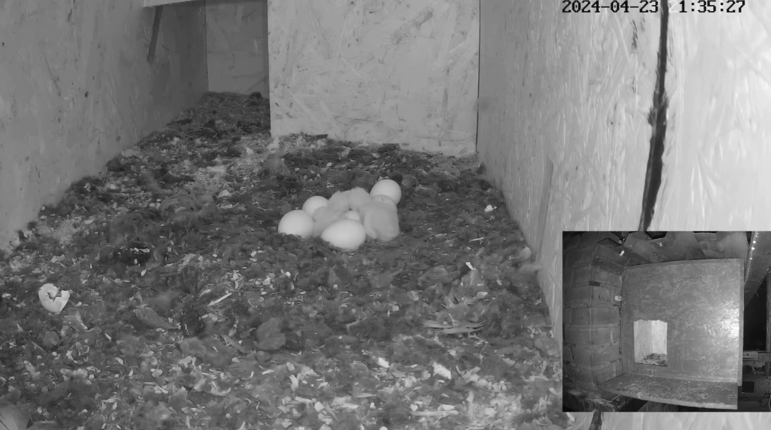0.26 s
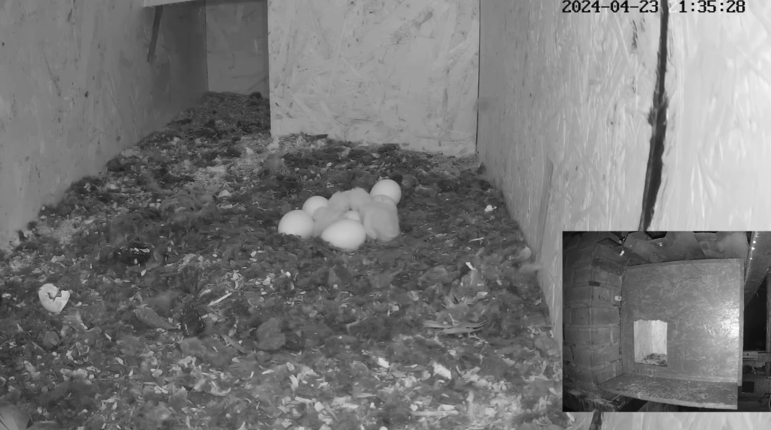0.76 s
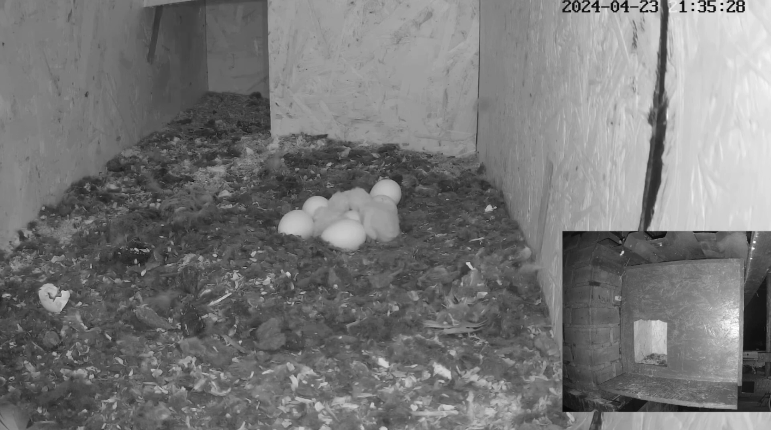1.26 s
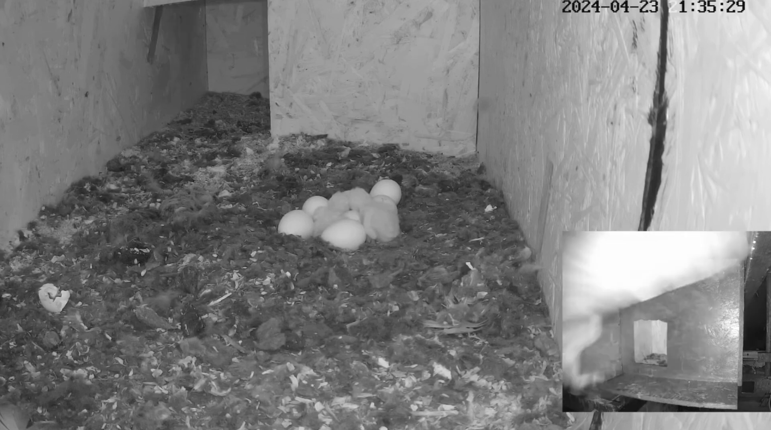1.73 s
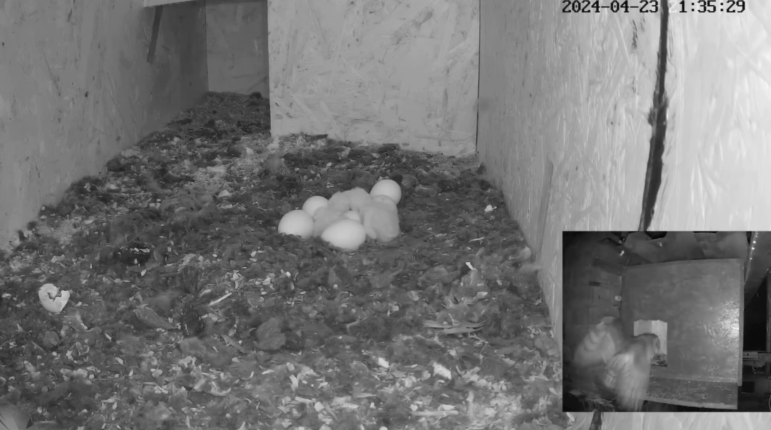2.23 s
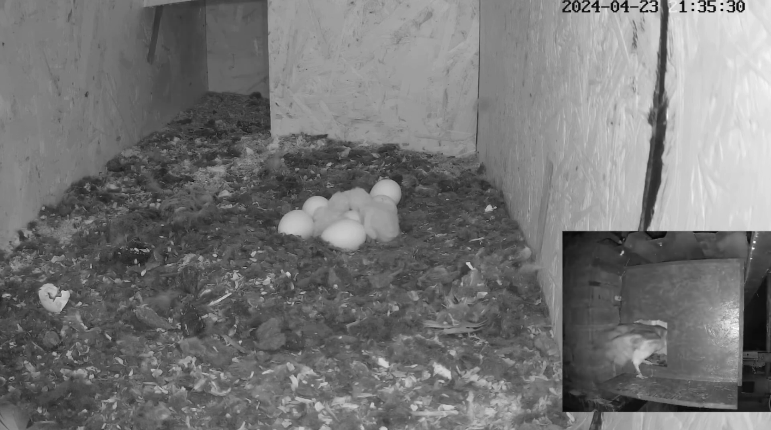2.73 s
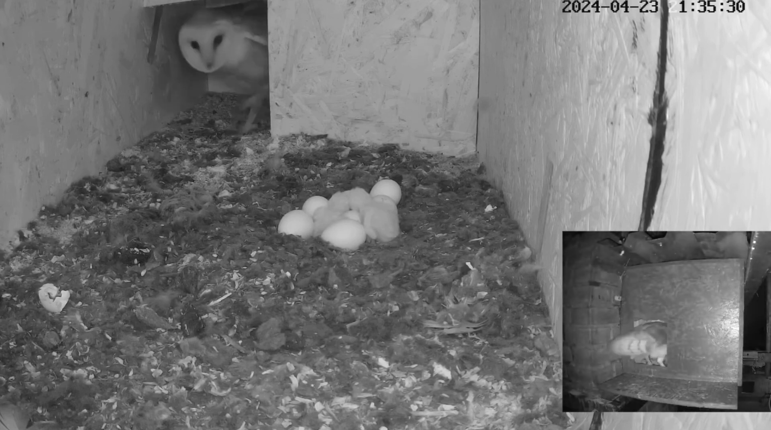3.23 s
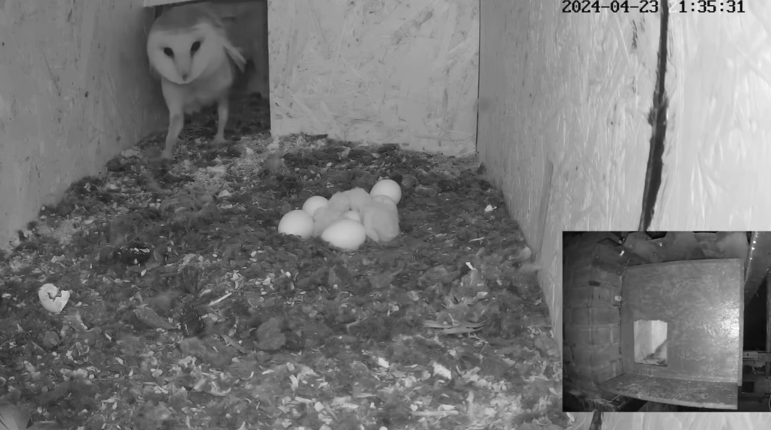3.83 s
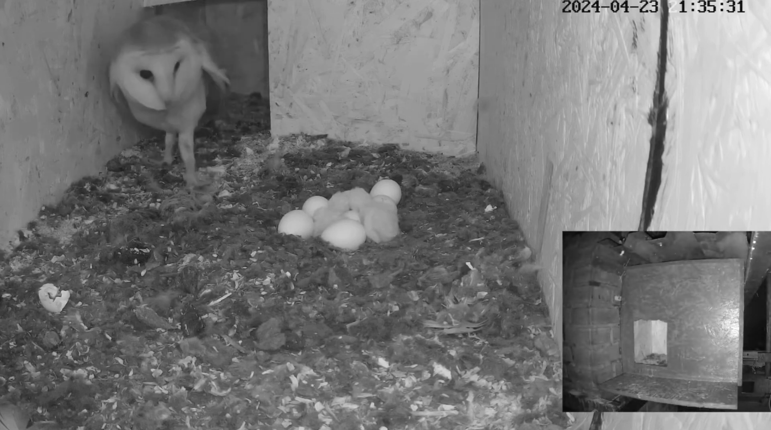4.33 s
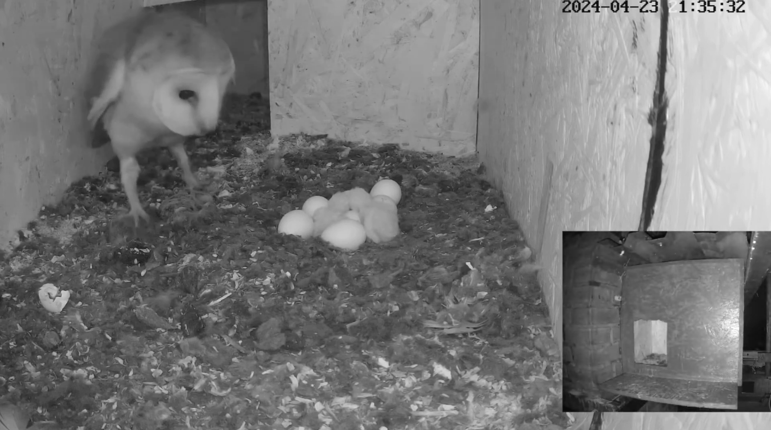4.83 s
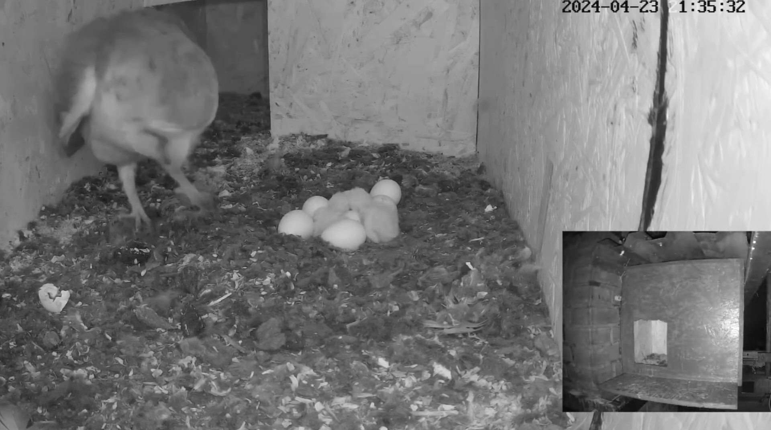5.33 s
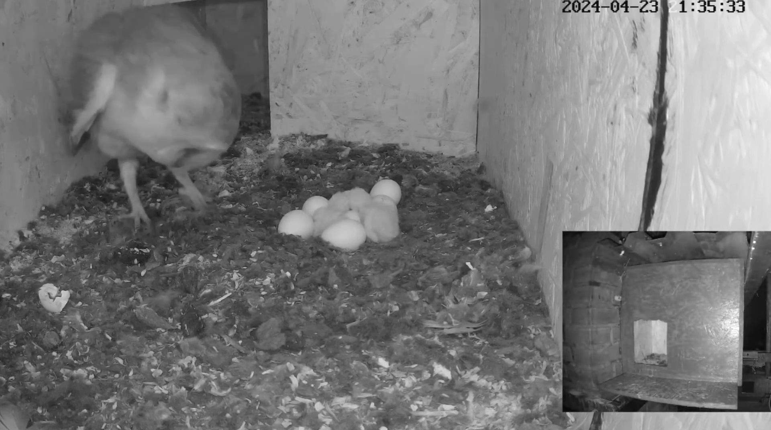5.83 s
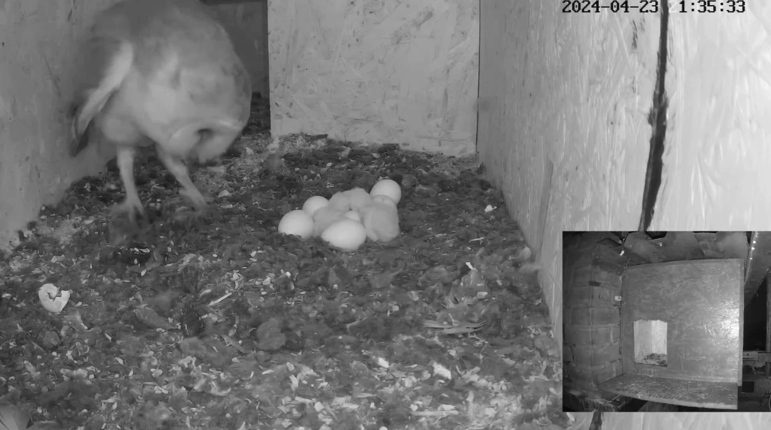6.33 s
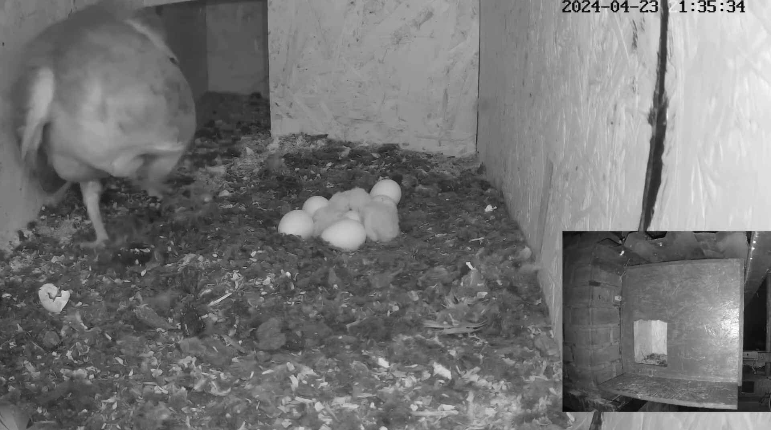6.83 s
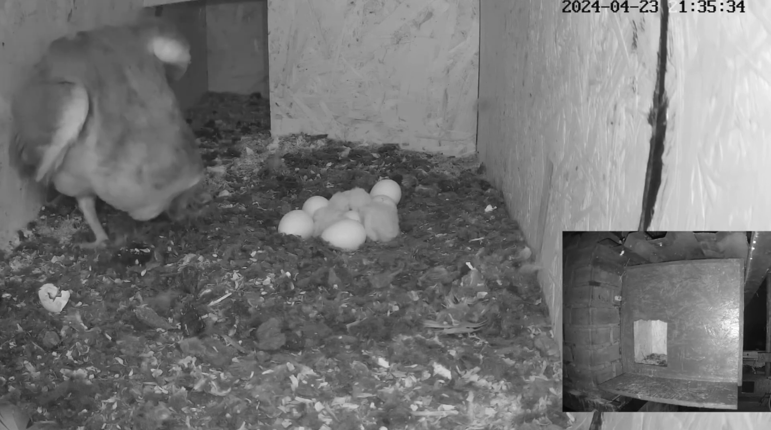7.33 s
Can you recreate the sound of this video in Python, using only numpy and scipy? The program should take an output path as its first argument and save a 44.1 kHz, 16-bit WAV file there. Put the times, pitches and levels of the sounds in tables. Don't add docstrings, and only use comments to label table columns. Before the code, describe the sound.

In a small wooden nest box at night, owl chicks give rapid bursts of high, upward-sliding chirps mixed with raspy breath. After the first burst an adult lands with a sharp, hollow wooden knock, its claws scrape at the entrance, and several footfalls clatter and boom softly. Chittering resumes three more times between quiet gaps. A close, hissy small camera microphone rumbles on its mount.

```python
import sys
import numpy as np
from scipy import signal
from scipy.fft import rfft, irfft
from scipy.io import wavfile
from scipy.ndimage import uniform_filter1d

SR = 44100
rng = np.random.default_rng(int(sys.argv[2]) if len(sys.argv) > 2 else 0)


def wrap_up_sound(samples):
    columns = np.atleast_2d(samples).T
    tamed = np.clip(columns, -1, 1)
    steps = np.round(tamed * 32767).astype(np.int16)
    wavfile.write(sys.argv[1], SR, steps)


def linear_from_db(decibels):
    return 10 ** (np.asarray(decibels, float) / 20)


N = 334278

# pitch_hz, level_db
CHICK_THROAT = [(1500, -15.5), (2300, -11.5), (2750, -15.5), (3450, -2), (3900, -1.5), (4400, 1), (4800, 6),
                (5200, -1.5), (5850, -7.5), (6400, -1.5), (7400, -15), (8500, -13), (9200, -21),
                (12000, -29)]
# start_s, peak_db, pitch_hz, t60_s
FLOOR_BOOMS = [(1.14, -27, 346, 0.079), (1.157, -35, 302, 0.15), (1.425, -36.5, 381, 0.23),
               (1.496, -35, 385, 0.054), (1.979, -48.5, 347, 0.17), (2.034, -42, 349, 0.15),
               (2.153, -37, 348.4, 0.22), (2.199, -40.5, 351, 0.12), (2.514, -40.5, 357.4, 0.25),
               (2.629, -49.5, 361, 0.13), (2.76, -54, 349, 0.16), (2.914, -53, 427, 0.079),
               (3.319, -49, 364, 0.2), (3.367, -51.5, 374, 0.48), (3.413, -40.5, 360, 0.19),
               (3.797, -46.5, 357, 0.068), (4.185, -61, 438, 0.16), (4.615, -50, 408, 0.095),
               (4.65, -52.5, 421, 0.14), (7.215, -56, 286, .15), (4.692, -48.5, 353.5, 0.13),
               (4.93, -62, 380, 0.33), (5.032, -51, 260, 0.047), (5.19, -59, 323, 0.14),
               (6.701, -45.5, 331, 0.19), (6.755, -47, 343, 0.093)]


def evened(x):
    return x / np.sqrt(np.mean(x ** 2) + 1e-20)


def drifting(noise, size):
    return evened(uniform_filter1d(uniform_filter1d(noise, size=size), size=size))


def read(points, hz):
    f, value = np.transpose(points)
    return np.interp(np.log(hz + 1), np.log(f + 1), value)


def add(mix, s, sound):
    part = mix[round(s * SR):][:len(sound)]
    part += sound[:len(part)]


def coloured(x, gain_db):
    return irfft(rfft(x) * linear_from_db(gain_db(np.fft.rfftfreq(len(x), 1 / SR))), len(x))


def hump(hz, centre_hz, octaves):
    return np.maximum(-6 * (np.log2((hz + 1) / centre_hz) / octaves) ** 2, -80)


def stroke(t, length, rise, fall):
    return np.clip(t / rise, 0, 1) * np.exp(-np.maximum(t - length, 0) / fall)


def hiss():
    # pitch_hz, density_db (per Hz)
    hiss_spectrum = [(35, -25), (60, -14), (248, -7), (350, -14), (440, -10), (1070, -13.5), (1180, -15),
                     (1780, -16.5), (2340, -18), (13000, -24.5), (14300, -21)]
    noise = coloured(rng.standard_normal(N), lambda f: read(hiss_spectrum, f))
    return linear_from_db(-57) * evened(noise)


def stirred(t, rest_db, step_db, share, rise, t60):
    firm_step_db = -40
    power = linear_from_db(2 * rest_db) + 0 * t
    for s, db, *_ in FLOOR_BOOMS:
        peak_db = step_db + share * (db - firm_step_db)
        below_db = np.where(t < s, 20 * (s - t) / rise, 60 * (t - s) / t60)
        power = power + linear_from_db(2 * (peak_db - below_db))
    return np.sqrt(power)


def shaking():
    # time_s, level_db
    shake_levels = [(0.0, -52), (0.78, -54), (1.1, -42), (1.14, -43), (1.26, -39), (1.33, -47),
                    (1.5, -38.5), (1.75, -53), (2.53, -55.5), (2.74, -48), (3.25, -57), (3.4, -47.5),
                    (4.03, -58), (4.35, -49.5), (4.96, -55), (5.47, -57.5), (7.28, -50.5), (7.58, -50)]
    # pitch_hz, density_db (per Hz)
    sway_spectrum = [(7.1, -47), (12, -11), (27, 7.5), (43, 5.5), (100, -20.5), (130, -47), (220, -120)]
    t, (a, b, c) = np.arange(N) / SR, rng.standard_normal((3, N))
    coarse = t[::100]
    sway = coloured(a, lambda f: np.where(f < 110, read(sway_spectrum, f), -90))
    shuffle = coloured(b, lambda f: hump(f, 118.0, 0.76))
    rustle = coloured(c, lambda f: hump(f, 354, 0.24))
    shuffle_level = stirred(coarse, rest_db=-67, step_db=-56.5, share=0.34, rise=0.14, t60=0.86)
    rustle_level = stirred(coarse, rest_db=-73.5, step_db=-66.5, share=0.17, rise=0.52, t60=2.5)
    return (linear_from_db(np.interp(t, *np.transpose(shake_levels))) * evened(sway)
            + np.interp(t, coarse, shuffle_level) * evened(shuffle)
            + np.interp(t, coarse, rustle_level) * evened(rustle))


def jolts():
    # start_s, peak_db, pitch_hz, t60_s
    jolt_table = [
        (1.02, -36, 37.5, 0.65),
        (1.374, -15, 15.6, 0.12),
        (1.4939, -32.5, 156, 0.11),
        (2.535, -42, 150, 0.11),
        (3.68, -45.5, 130, 0.1),
        (5.009, -37, 46, 0.36),
        (6.674, -40, 43.5, 0.18),
        (6.72, -48.5, 170, 0.14),
        (7.196, -38, 53, 0.16),
    ]
    mix, t = np.zeros(N), np.arange(20000) / SR
    for s, db, hz, t60 in jolt_table:
        rise = np.clip(t * hz / 0.44, 0, 1)
        add(mix, s, linear_from_db(db + 1.5 - 60 * t / t60) * rise * np.sin(2 * np.pi * hz * t))
    return mix


def boom(db, hz, t60, phases):
    t = np.arange(14000) / SR
    modes = [(1, 0.96), (1.17, 0.26), (0.4, 0.22), (1.55, 0.12), (.74, 0.16)]
    cluster = sum(g * np.sin(2 * np.pi * (hz * ratio * t + p)) for (ratio, g), p in zip(modes, phases))
    swell = 1 - np.exp(-(t / 0.0048) ** 2)
    sound = linear_from_db(-60 * t / np.clip(t60, .05, .4)) * swell * cluster
    return linear_from_db(db + 4.0) * sound / abs(sound).max()


def booms():
    floor_hz = 345
    mix = np.zeros(N)
    for (s, *row), phases in zip(FLOOR_BOOMS, rng.random((len(FLOOR_BOOMS), 4))):
        add(mix, s - .006, boom(*row, [floor_hz * s, *phases]))
    return mix


def panel(drive, centre_hz, octaves):
    # pitch_hz, level_db, t60_s
    panel_modes = [(496, 16, 0.046), (542, 5, 0.11), (688, -8, 0.029), (957, 1, 0.027), (1053, 9.5, 0.028),
                   (1380, 10, 0.048), (1700, 14, 0.023), (1840, 8, 0.051), (2120, 5, 0.011),
                   (2550, 2, 0.088), (2620, -1, 0.031), (2960, -3, 0.031), (3170, 7, 0.038),
                   (3720, -9, 0.042)]
    t, sound = np.arange(len(drive)) / SR, linear_from_db(-120) * drive
    for hz, db, t60 in panel_modes:
        near_db = hump(hz, centre_hz, octaves)
        if near_db < -38:
            continue
        mode = linear_from_db(-60 * t / min(t60, .08)) * np.sin(2 * np.pi * hz * t)
        ring = signal.fftconvolve(drive, mode)[:len(t)]
        sound = sound + linear_from_db(db + near_db) * evened(ring)
    return sound


def knock(length, wood_db, wood_hz, claw_db, claw_hz, noise, luck):
    t = np.arange(len(noise)) / SR
    slips = np.convolve(luck < .005, np.exp(-t[:400] / 0.00075))[:len(t)]
    touch = stroke(t, length, .25 * length, np.minimum(.6 * length, .005))
    impacts = noise * (.6 + slips) * touch
    wood = panel(noise * touch, wood_hz, .17)
    upper = panel(impacts, claw_hz, 0.35)
    padded = np.pad(impacts, 500)
    scratch = coloured(padded, lambda f: hump(f, claw_hz, claw_hz / 4200))[500:-500]
    held = int((length + .003) * SR)
    wood, upper, scratch = (v / np.sqrt(np.mean(v[:held] ** 2)) for v in (wood, upper, scratch))
    grip = np.clip((4200 - claw_hz) / 2500, 0, 1)
    return linear_from_db(wood_db) * wood + linear_from_db(claw_db) * (0.24 * grip * upper + 0.82 * scratch)


def contacts():
    # start_s, length_s, wood_db, wood_centre_hz, claw_db
    foot_knocks = [(1.121, 0.0077, -32, 895, -44.5), (1.126, 0.013, -40, 680, -45),
                   (1.121, 0.006, -39, 2530, -44), (1.124, 0.023, -44, 1840, -61),
                   (1.15, 0.0085, -43, 1140, -50), (1.358, 0.014, -56.5, 780, -66),
                   (1.415, 0.011, -40, 940, -45), (1.424, 0.03, -40, 730, -48.5),
                   (1.414, 0.021, -49, 1380, -54), (1.45, 0.031, -56, 1020, -46),
                   (1.488, 0.0078, -48.5, 1210, -49.5), (1.4942, 0.0037, -46.5, 516, -58),
                   (1.819, 0.0069, -47.5, 990, -48), (1.824, .014, -55, 690, -61),
                   (1.973, 0.024, -57, 1200, -71), (2.013, 0.035, -47, 840, -43),
                   (2.028, 0.02, -44.5, 540, -43), (2.024, .03, -57, 2120, -60),
                   (2.03, 0.026, -49, 1760, -45), (2.126, 0.0016, -35.5, 1750, -59),
                   (2.127, 0.026, -49, 1380, -52), (2.13, 0.013, -45, 2100, -61),
                   (2.503, 0.0073, -55.5, 763, -51.5), (2.507, 0.035, -60, 1520, -58.5),
                   (2.551, 0.029, -66, 1960, -66), (2.556, 0.089, -70, 885, -61),
                   (2.952, 0.0058, -52.5, 880, -55), (3.426, 0.017, -53.5, 950, -69),
                   (3.788, 0.0081, -58, 940, -65), (5.023, 0.0035, -64, 700, -68),
                   (6.654, 0.0047, -61, 850, -70)]
    # start_s, length_s, level_db, centre_hz
    claw_ticks = [(1.414, .06, -58, 3800), (1.548, 0.021, -60.5, 2370), (1.625, 0.0045, -55, 2550),
                  (1.656, .02, -60, 2340), (1.822, 0.0032, -45, 2540), (2.016, 0.025, -42.5, 3530),
                  (2.0334, 0.0022, -34, 2700), (2.037, 0.0019, -45, 2200), (2.039, 0.0017, -42.5, 3200),
                  (2.0449, 0.001, -38, 1910), (2.1295, 0.0025, -37.5, 2130), (2.1294, .003, -38.5, 2700),
                  (2.506, 0.0024, -55, 2180), (1.125, 0.0084, -58, 3700), (2.192, 0.0091, -55.5, 2030),
                  (2.325, 0.0086, -57, 2400), (6.653, 0.0031, -51, 5530), (6.654, 0.0032, -50, 2200),
                  (6.716, 0.0042, -56, 7000)]
    # start_s, level_db, centre_hz
    drag_slips = [(1.4185, -49, 3400), (1.4282, -45.5, 3550), (1.4315, -41, 2500), (1.4413, -41, 2920),
                  (1.4516, -46, 3300), (1.452, -42, 2900), (1.458, -50, 3200), (1.4625, -47, 2700),
                  (1.467, -45, 2400), (1.473, -44, 2500), (1.4895, -46, 3300)]
    slip_s, sill_db, sill_hz = 0.00077, -5, 850
    tick_wood_db, foot_claw_hz = -36, 2400
    touches = [(*row, foot_claw_hz) for row in foot_knocks]
    touches += [(s, d, db + tick_wood_db, 1400, db, hz) for s, d, db, hz in claw_ticks]
    touches += [(s, slip_s, db + sill_db, sill_hz, db, hz) for s, db, hz in drag_slips]
    mix = np.zeros(N)
    noise, luck = rng.standard_normal((len(touches), 8192)), rng.random((len(touches), 8192))
    for k, (s, *row) in enumerate(touches):
        size = int((row[0] + .09) * SR)
        add(mix, s, knock(*row, noise[k, :size], luck[k, :size]))
    return mix


def squeak():
    start_s, length_s, pitch_hz, level_db = 1.4705, .009, 2700, -52
    mix, t = np.zeros(N), np.arange(int(length_s * SR)) / SR
    tone = sum(np.sin(2 * np.pi * k * pitch_hz * t) for k in range(1, 4))
    add(mix, start_s, linear_from_db(level_db) * np.hanning(len(t)) * tone)
    return mix


def landing():
    # start_s, level_db
    toe_blows = [
        (1.1225, -10),
        (1.1258, 0),
        (1.134, -2),
    ]
    # pitch_hz, level_db, t60_s
    roof_modes = [(760, -26, .03), (920, -39, 0.023), (1004, -16, 0.052), (1040, -32, 0.042),
                  (1104, -20, 0.034), (1480, -38, 0.033), (1800, -39, 0.046), (2100, -43, .03),
                  (2450, -36, 0.05), (2330, -39, .022), (2870, -46, .03), (3300, -54, .04),
                  (4410, -51, .04)]
    rise_s, scatter_turns = 0.0013, .25
    mix, t = np.zeros(N), np.arange(6000) / SR
    for (s, blow_db), phases in zip(toe_blows, rng.random((len(toe_blows), len(roof_modes)))):
        ring = sum(linear_from_db(db - 60 * t / t60) * np.sin(2 * np.pi * (hz * t + scatter_turns * p))
                   for (hz, db, t60), p in zip(roof_modes, phases))
        add(mix, s, linear_from_db(blow_db) * ring * (1 - np.exp(-t / rise_s)))
    return mix


def adult():
    return landing() + booms() + contacts() + squeak() + jolts()


def box(mix):
    # pitch_hz, level_db, t60_s
    air_modes = [(2930, -26, 0.13), (3170, -34, 0.045), (3590, -5, 0.36), (3906, 2.5, 0.078),
                 (4610, -3.5, 0.12), (4785, -11, 0.049), (5460, -6, 0.031), (6090, -5, 0.023),
                 (6430, -2, 0.039), (6697, 2.5, 0.042), (6840, -0.5, 0.029), (7200, -15, 0.026),
                 (8800, 0, 0.022), (9110, 2.5, 0.027)]
    tail_db, tail_t60_s = -10, 0.058
    t = np.arange(4000) / SR
    echoes = rng.choice([-1., 1.], len(t)) * (rng.random(len(t)) < .05) * (t > .003)
    walls = echoes * linear_from_db(-60 * t / tail_t60_s)
    modes = np.zeros(len(t))
    for k, (hz, db, t60) in enumerate(air_modes):
        unit_gain = 2 * np.log(1000) / (t60 * SR)
        modes += (-1) ** k * linear_from_db(db - 60 * t / t60) * unit_gain * np.sin(2 * np.pi * hz * t)
    response = linear_from_db(1.5) * modes + linear_from_db(tail_db) * walls / np.linalg.norm(walls)
    return mix + signal.oaconvolve(mix, response)[:N]


def rasp(length, db, rise, breath):
    flap_hz, wander, voiced = 640, .09, .5
    t = np.arange(len(breath)) / SR
    puffs = linear_from_db(3.0 * drifting(breath[::-1], 100))
    drift = drifting(np.roll(breath, 3000), 260)
    turns = 2 * np.pi * np.cumsum(flap_hz * (1 + wander * drift)) / SR
    flaps = evened(sum(np.cos(k * turns + k * k) for k in range(3, 14)))
    source = (voiced * flaps + (1 - voiced) * breath) * puffs
    air = coloured(source, lambda f: 1.12 * read(CHICK_THROAT, f * 1.012) + hump(f, 2900, 7.0))
    return linear_from_db(db - 5.2 * t / length) * evened(air) * stroke(t, length - .004, rise, 0.0013)


def note(length, start_hz, mid_hz, end_hz, db, chance, climb=1, bend=1, held=False):
    flutter_db, ragged_db = 2.6, 1.6
    held_dull_db, held_fade_db = -1, 1.5
    root_db, release_s = -3, .006
    u = np.linspace(0, 1, int(length * SR))
    hz = np.polyval(np.polyfit([0, .5, 1], [start_hz, mid_hz, end_hz], 2), u)
    if held:
        hz = start_hz + (end_hz - start_hz) * np.sin(np.pi / 2 * np.minimum(u / climb, 1)) ** bend
    wobble, flutter = (drifting(c, 40)[:len(u)] for c in chance)
    turns = 2 * np.pi * np.cumsum(hz * (1 + .008 * wobble)) / SR
    glide = np.clip(end_hz / start_hz - 1, 0, .45)
    swell_db = 10.0 * glide * (np.exp(-((u - .4) / 0.61) ** 2) - 1)
    bright_db = -2.5 + 1.04 * (db + 42.0 + swell_db)
    gains = np.array([linear_from_db(read(CHICK_THROAT, k * hz) + 0.14 * swell_db + bright_db * min(k - 1, 1) - 0.51 * k)
                      for k in range(1, 6)])
    gains[1:] *= np.clip(u * length / (0.0021 + held * 0.03 * glide), 0, 1)
    gains[2:] *= linear_from_db(held * held_dull_db * np.arange(1, 4)[:, None] * np.clip(u / climb, 0, 1.3) ** 3)
    gains[0] *= linear_from_db(held * root_db * (2 - 3.2 * u ** 3))
    gains *= linear_from_db([ragged_db * k * np.roll(flutter, 97 * k) for k in range(5)])
    voice = (gains * np.sin(np.arange(1, 6)[:, None] * turns)).sum(0)
    strong = np.percentile(np.sqrt((gains ** 2).sum(0) / 2), 80)
    level = linear_from_db(db + flutter_db * flutter + held * held_fade_db * u ** 3)
    release = np.clip((1 - u) * length / release_s, 0, 1) ** .5
    return level * voice / strong * release * signal.windows.tukey(len(u), 0.004 / length)


def chicks():
    # start_s, length_s, start_hz, top_hz, level_db
    main_sweeps = [(0.178, 0.039, 2060, 2800, -39.5), (0.554, 0.046, 1990, 2735, -44),
                   (1.775, 0.036, 1770, 2620, -38.5), (1.864, 0.031, 1930, 2760, -41),
                   (3.095, 0.035, 1740, 2580, -38.5), (3.176, 0.034, 1700, 2700, -38),
                   (3.271, 0.041, 1800, 2840, -42.5), (3.374, 0.035, 1803, 2770, -39),
                   (4.21, 0.031, 1743, 2810, -37.5), (4.294, 0.044, 1800, 2920, -40.5),
                   (4.6, 0.014, 1800, 2490, -44.5), (6.273, 0.028, 1810, 2625, -39.5),
                   (6.36, 0.041, 1730, 2690, -44), (7.459, 0.028, 1744, 2660, -37),
                   (7.551, 0.032, 2330, 2704, -40.5)]
    # start_s, length_s, start_hz, top_hz, level_db
    ramp_sweeps = [
        (0.266, 0.04, 2190, 2930, -39.5),
        (0.361, 0.042, 2224, 2900, -40),
        (0.461, 0.038, 2240, 2900, -40.5),
        (1.954, 0.034, 2040, 2930, -44.5),
        (2.051, 0.036, 2190, 2980, -44),
        (4.394, 0.036, 1944, 2990, -39),
        (6.184, 0.03, 1746, 2594, -37),
    ]
    # start_s, length_s, middle_hz, level_db
    return_strokes = [(0.21, 0.05, 2330, -48), (0.303, 0.04, 2294, -50.5), (0.404, 0.03, 2300, -49),
                      (0.5, 0.028, 2290, -51), (2.1, 0.024, 2200, -53), (3.134, 0.018, 2110, -53),
                      (3.322, 0.024, 2120, -55), (3.413, 0.026, 2180, -54), (4.238, 0.04, 2360, -47.5),
                      (4.337, 0.036, 2350, -50), (4.44, 0.032, 2270, -51)]
    # start_s, length_s, middle_hz, level_db
    upward_pips = [(0.111, 0.039, 2524, -43.5), (4.142, 0.016, 2237, -44), (4.153, .014, 2900, -56),
                   (4.166, 0.019, 3360, -50), (0.213, 0.014, 3110, -51), (0.33, 0.017, 3250, -48),
                   (0.428, 0.023, 2390, -47), (0.528, 0.025, 2390, -53), (0.531, 0.028, 3450, -55),
                   (1.717, 0.018, 2410, -38), (1.93, .022, 3070, -47.5), (2.119, 0.018, 3280, -48),
                   (3.023, 0.015, 2400, -40.5), (3.042, 0.026, 2960, -54), (3.148, 0.015, 3160, -46),
                   (3.344, 0.018, 3170, -47), (3.435, 0.017, 3230, -47), (4.368, .015, 3360, -46),
                   (4.556, 0.034, 3300, -48.5), (4.595, 0.0063, 2400, -40), (6.12, 0.021, 2490, -48),
                   (7.41, 0.015, 2860, -53.5), (6.236, 0.009, 2980, -50), (6.335, 0.015, 3100, -48),
                   (6.431, 0.02, 3290, -55), (6.466, 0.0089, 2420, -41.5), (6.48, 0.016, 3015, -45.5),
                   (7.51, 0.013, 3140, -46.5)]
    # start_s, length_s, middle_hz, drop_share, level_db
    falling_peeps = [(0.617, 0.015, 3410, .01, -48.5), (1.729, 0.013, 2340, 0.074, -46),
                     (1.805, 0.038, 2960, 0.038, -51.5), (1.895, .008, 3250, .02, -50),
                     (1.9, 0.02, 3140, 0.091, -49), (1.989, 0.015, 3340, 0.051, -44),
                     (2.006, 0.014, 3100, .08, -50.5), (2.135, 0.025, 3650, 0.0091, -46.5),
                     (2.158, 0.034, 3265, 0.28, -45.5), (3.054, 0.0097, 3300, .01, -52),
                     (3.092, 0.014, 3540, .01, -52), (3.211, 0.019, 3170, 0.026, -49),
                     (3.224, .02, 2930, .04, -50), (3.313, 0.028, 3210, .1, -48.5),
                     (3.452, 0.022, 3520, .01, -52), (3.478, 0.028, 3180, 0.22, -45.5),
                     (4.33, 0.013, 3250, .015, -50.5), (4.428, 0.011, 3410, .02, -44.5),
                     (4.439, 0.019, 3180, 0.046, -53), (4.46, .016, 3250, .01, -56),
                     (4.508, 0.021, 3464, 0.051, -40.5), (4.537, 0.018, 3170, 0.044, -54),
                     (2.085, 0.025, 3320, .1, -56), (4.614, 0.017, 3050, 0.1, -48.5),
                     (6.14, .011, 3070, .01, -54.5), (6.243, 0.019, 3500, .02, -58),
                     (6.301, 0.025, 3114, 0.07, -54.5), (7.395, 0.014, 2810, 0.088, -46.5),
                     (7.498, 0.017, 3040, 0.044, -48.5)]
    # start_s, length_s, level_db
    breath_rasps = [(0.118, 0.016, -44), (0.131, 0.029, -44), (0.238, 0.012, -43.5), (.246, 0.033, -50),
                    (0.292, 0.01, -45), (.39, .011, -46), (0.491, .011, -47), (0.331, 0.024, -47),
                    (0.425, 0.055, -50.5), (0.524, 0.019, -43), (1.832, 0.023, -45.5), (1.89, 0.0098, -47),
                    (1.98, 0.02, -45), (2.073, 0.023, -46), (3.017, 0.015, -46), (3.034, .05, -48),
                    (3.249, 0.019, -45.5), (3.298, 0.022, -48.5), (3.447, 0.045, -49), (4.135, 0.049, -45),
                    (4.162, 0.037, -51), (4.268, 0.021, -45.5), (4.469, 0.051, -45), (4.572, 0.036, -48),
                    (4.598, .024, -41), (6.12, 0.031, -45), (6.156, 0.0069, -50), (6.236, 0.024, -47),
                    (6.384, 0.017, -51), (6.438, 0.055, -47), (7.384, 0.021, -45.5), (7.406, 0.027, -50),
                    (7.517, 0.032, -47)]
    main_shape, ramp_shape = (.72, 1.7), (0.83, 1.6)
    ends = 1 - 0.023
    puff_lead_s, puff_s, puff_db, puff_rise_s = .027, 0.025, -4.5, 0.011

    sweeps = main_sweeps + ramp_sweeps
    notes = [(s, d, hz, (hz + top_hz) / 2, top_hz, db) for s, d, hz, top_hz, db in sweeps]
    notes += [(s, d, 1.1 * hz, hz, .92 * hz, db) for s, d, hz, db in return_strokes]
    notes += [(s, d, .94 * hz, hz, 1.095 * hz, db) for s, d, hz, db in upward_pips]
    notes += [(s, d, (ends + drop / 2) * hz, hz, (ends - drop / 2) * hz, db)
              for s, d, hz, drop, db in falling_peeps]
    rasps = [(*row, .0035) for row in breath_rasps]
    rasps += [(s + d / 3 - puff_lead_s, puff_s, db + puff_db, puff_rise_s) for s, d, *_, db in sweeps]

    mix = np.zeros(N)
    for k, (s, *row) in enumerate(notes):
        shape = main_shape if k < len(main_sweeps) else ramp_shape
        add(mix, s, note(*row, rng.standard_normal((2, 4000)), *shape, held=k < len(sweeps)))
    for (s, *row), breath in zip(rasps, rng.standard_normal((len(rasps), 6000))):
        add(mix, s, rasp(*row, breath))
    return mix


def scene():
    return (box(chicks() + adult()) + shaking() + hiss())[None]


def top_cut(x):
    return signal.sosfilt(signal.butter(12, 14440, fs=SR, output="sos"), x)


def record(dry):
    packet_gaps = [4.074, 4.714, 5.0341, 5.29, 5.674, 5.994, 6.25, 6.57, 6.634, 6.9539, 7.21, 7.53]
    gap_s, edge_hz = .002, 13570
    t = np.arange(N) / SR
    kept = np.all([(t < s) | (t > s + gap_s) for s in packet_gaps], axis=0)
    band = signal.firwin(255, edge_hz, window=("kaiser", 8), fs=SR)
    return top_cut(signal.oaconvolve(dry, band[None], "same") * kept)


dry = scene()
out = record(dry)
wrap_up_sound(out)
```